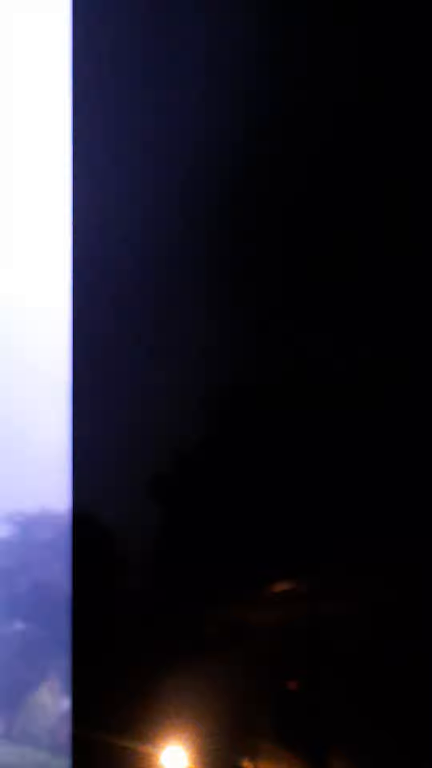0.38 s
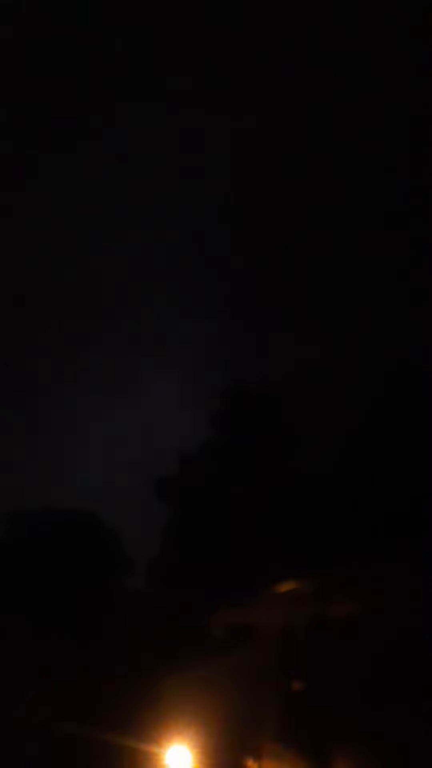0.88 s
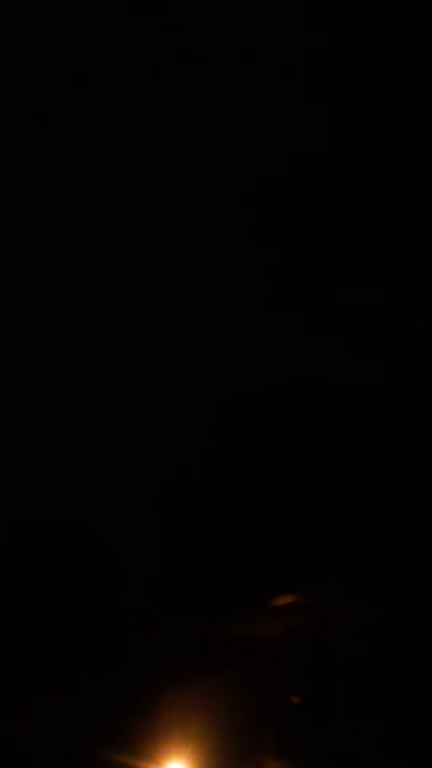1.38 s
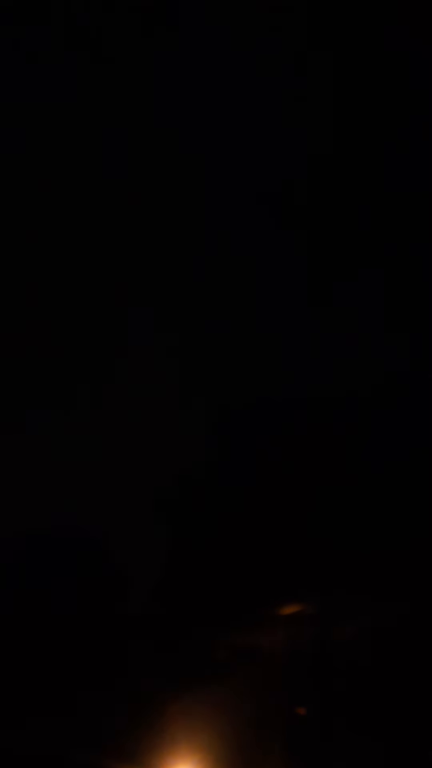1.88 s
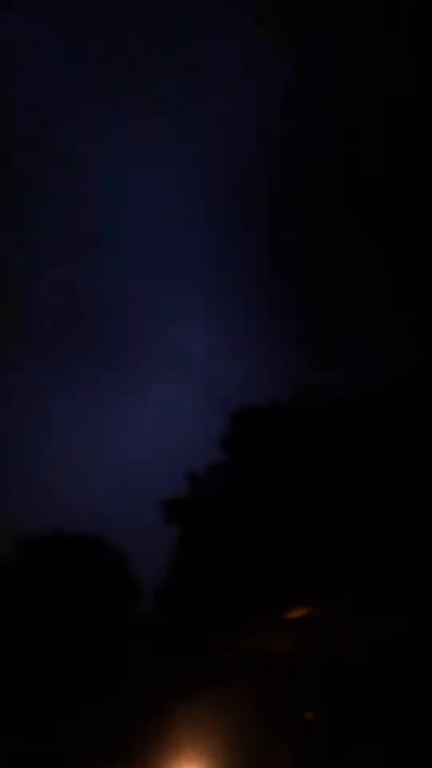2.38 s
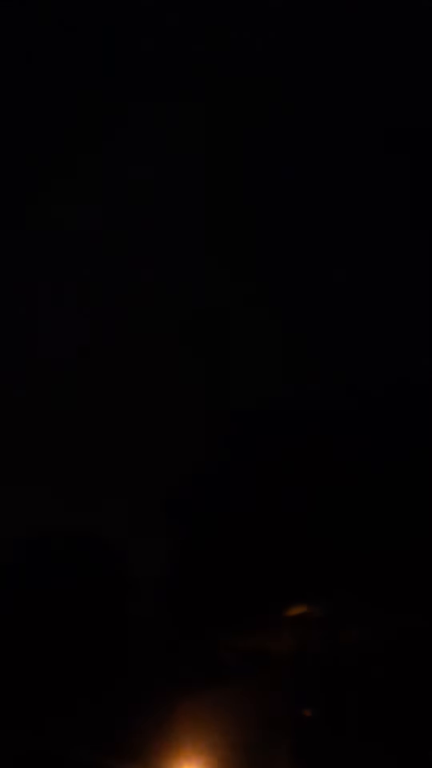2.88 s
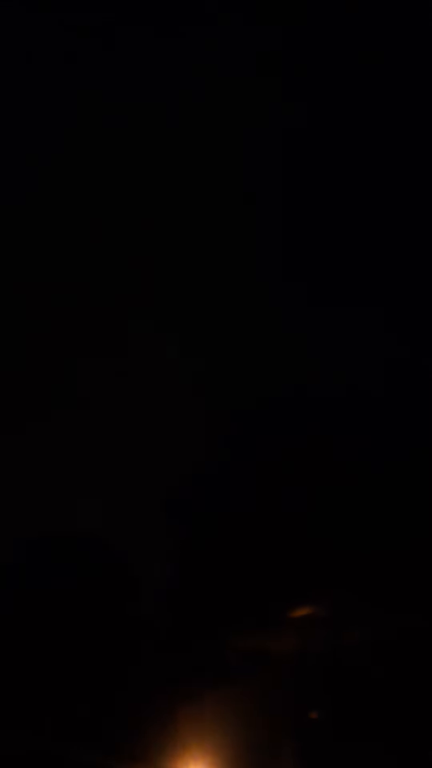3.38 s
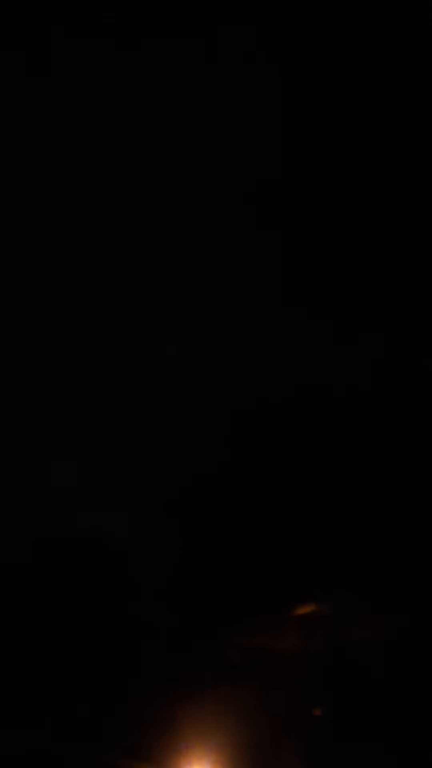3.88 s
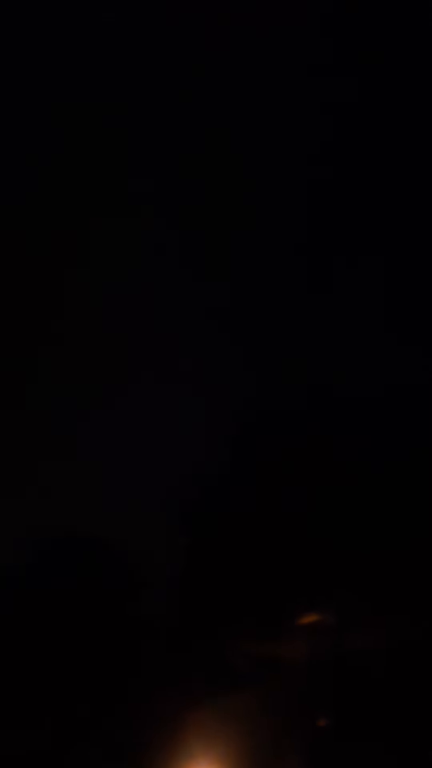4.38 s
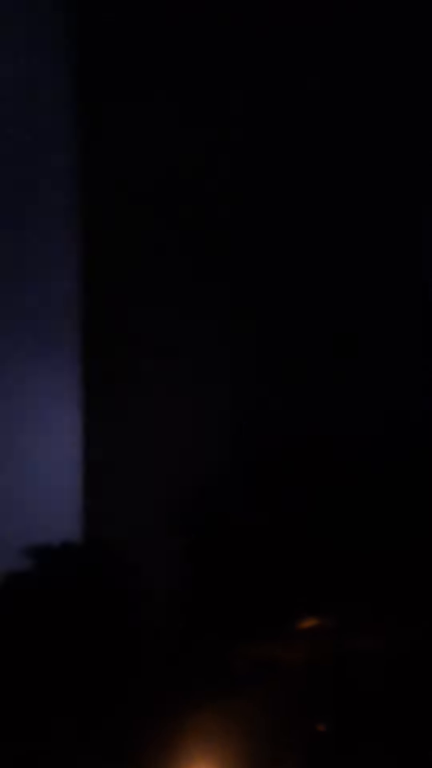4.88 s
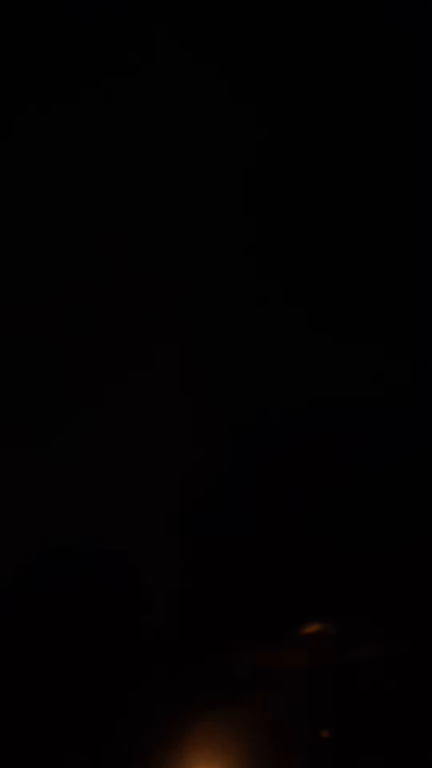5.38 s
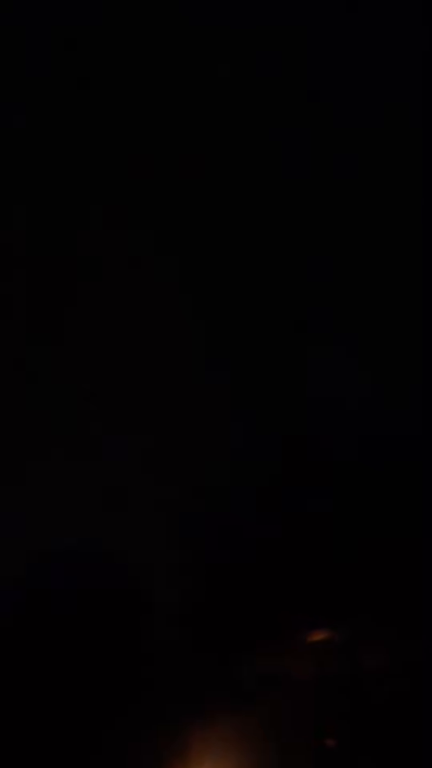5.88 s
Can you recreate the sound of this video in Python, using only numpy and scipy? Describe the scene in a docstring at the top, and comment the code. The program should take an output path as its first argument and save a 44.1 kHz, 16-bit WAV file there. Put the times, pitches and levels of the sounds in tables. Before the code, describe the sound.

An outdoor night rainstorm heard from two microphones a hand apart, near a taut cover. From 0 s big drops strike irregularly, several per second: crisp wet splats with fine bright spray, short smacks and hollow, quickly damped thumps, mostly to the left. Strong ones fall at about 0.1, 0.5, 1.1, 1.3, 1.65 and 1.8 s; they thin out from 2 to 3 s. Behind is a quiet wide rain wash with tiny ticks, dull patter and a faint far rumble. Thunder stirs around 3.2 s and bursts out loudly at 3.5 s, a dense low boom with ringing, knocking claps and rough tearing crackle. It eases around 4.2 to 4.5 s, surges with rapid claps from 4.55 to 5.4 s, then sinks, with a last clap at 5.9 s. Sharp drops still cut through, notably at 3.45, 5.0, 5.4 and 5.97 s; the thunder is still rumbling at the end.

```python
"""Big drops splat, smack and thump on a taut cover close to two microphones a hand apart, outdoors.
Splats and sprays are coloured noise bursts; smacks and thumps are dying modes of the cover.
From about 3 s thunder rolls in and then sinks: scattered shocks, with sudden ringing claps and crackle.
Behind it all lie small ticks, dull patter, a diffuse wash of rain and a far rumble, all shaped noise."""
import sys
import numpy as np
from scipy import signal
from scipy.io import wavfile
from scipy.ndimage import uniform_filter1d, minimum_filter1d

SR = 44100
rng = np.random.default_rng(int(sys.argv[2]) if len(sys.argv) > 2 else 0)


def pcm_store(signal):
    """Save signal as 16-bit PCM."""
    levels = np.round(np.clip(np.atleast_2d(signal), -1, 1) * 32767)
    wavfile.write(sys.argv[1], SR, levels.astype(np.int16).T)


def to_linear_factor(level_db):
    """Convert decibel levels (scalar or array-like) to linear amplitude factors."""
    exponent = np.asarray(level_db, float) / 20
    return 10 ** exponent


N = 265482  # samples


def evened(x):
    """Scales to rms 1."""
    return x / np.sqrt(np.mean(x ** 2) + 1e-20)


def read(points, hz):
    """Reads a table on a log-frequency axis."""
    table_hz, value = np.transpose(points)
    return np.interp(np.log(hz + 1), np.log(table_hz + 1), value)


def curve(rows):
    """Spreads a (time, level) table over every sample."""
    time_s, level_db = np.transpose(rows)
    return np.interp(np.arange(N) / SR, time_s, level_db)


def colour(x, points):
    """Minimum-phase filter whose gain follows a spectrum; white noise keeps its level."""
    level_db = read(points, abs(np.fft.fftfreq(8192, 1 / SR)))
    log_gain = np.log(to_linear_factor(np.maximum(level_db, -100)))
    taps = np.fft.ifft(np.exp(np.conj(signal.hilbert(log_gain)))).real[:4096]
    taps = taps[None] / np.linalg.norm(taps)
    return signal.oaconvolve(x, taps, axes=1)[:, :x.shape[1]]


def add(mix, start_s, sound, pan_db, lag_s):
    """Places a sound by level and arrival time; positive pan and lag favour the left microphone."""
    for side, sign in enumerate((1, -1)):
        start = max(round((start_s - sign * lag_s / 2) * SR), 0)
        part = mix[side, start:][:sound.shape[1]]
        part += to_linear_factor(sign * pan_db / 2) * sound[side, :len(part)]


def ring(modes, phases, t):
    """Sums dying sine modes (Hz, dB, t60 in s), each with a starting phase in cycles."""
    out = 0
    for (hz, db, t60), phase in zip(modes, phases):
        out = out + to_linear_factor(db - 60 * t / t60) * np.sin(2 * np.pi * (hz * t + phase))
    return out


def scattered(per_s, spread_db, centre_s, width_s, count=9):
    """Random impulses of uneven size from several directions, each with its own lag between the microphones."""
    out = np.zeros((2, N))
    for place in np.linspace(-1, 1, count):
        size = to_linear_factor(spread_db * np.minimum(rng.exponential(1, N), 4)) * rng.choice([-1., 1.], N)
        train = size * (rng.random(N) < per_s / count / SR)
        lag = round((centre_s + width_s * place) * SR)
        out += [train, np.roll(train, lag)]
    return evened(out)


# big drops close by: start_s, splat_db (noise before its envelope), spray_db (rms over the first 6 ms),
# smack_db (added to each smack mode), pan_db (left over right, for the splat)
DROPS = [(0.0074, -30, -48, -35, 2.5), (0.0204, -46, -59, -40, 11), (0.0913, -10.5, -36, -24.5, 12),
         (0.101, -21, -35.5, -29.5, 8.5), (0.1887, -23, -37, -38.5, 21.5), (0.2811, -13, -32.5, -36, 9.5),
         (0.3003, -34, -53, -37, 3.5), (0.483, -21, -36.5, -28, 19.5), (0.488, -18.5, -33, -18, 4),
         (0.4982, -35, -61, -37.5, -23), (0.5671, -42, -59, -38, 5), (0.826, -48, -60, -37.5, 2.5),
         (0.958, -48, -62, -39, 2), (0.9797, -42, -58, -38, 5), (1.014, -25.5, -34.5, -27.5, 20),
         (1.0425, -38.5, -48, -36, -30), (1.116, -14.5, -34, -24, 6), (1.264, -30, -43, -35, 4.5),
         (1.2785, -24.5, -42, -25.5, 6), (1.3132, -23.5, -36, -27, 7), (1.3424, -39, -51, -38.5, 1),
         (1.393, -32, -46, -48, 4.5), (1.551, -33, -47, -33.5, 6), (1.5898, -25, -46, -37, 4.5),
         (1.601, -32, -43, -40, 6.5), (1.644, -21, -40, -24, -7), (1.694, -30.5, -50, -48, 3.5),
         (1.7672, -24.5, -46, -38, 5), (1.7947, -21, -35, -32.5, 11.5), (1.9844, -27.5, -40, -38.5, 11.5),
         (2.1156, -27, -54, -28, -2), (2.1928, -37.5, -44, -32, -11), (2.2301, -32, -42, -34, 6),
         (2.2573, -27, -45, -34, 1.5), (2.303, -39, -34.5, -58, 3), (2.492, -29.5, -43, -29, 6.5),
         (2.5697, -28.5, -40, -38, 4), (2.7137, -36, -44, -33.5, 10), (2.8657, -17, -38, -24.5, 5.5),
         (3.1732, -23, -34.5, -28.5, 5), (3.3613, -26, -37, -49, -2.5), (3.368, -44, -33.5, -51, -1),
         (3.3844, -22, -47, -22, 3), (3.3914, -24, -32, -27, 7), (3.456, -10.5, -29, -20, 4.5),
         (3.604, -22, -36, -44, 4), (3.7051, -22, -32.5, -24.5, 0.5), (3.806, -25, -45, -48, 5.5),
         (3.9539, -25, -34, -27, 5.5), (4.3467, -52, -47, -26, 9.5), (4.492, -31, -42.5, -52, 0.5),
         (4.7441, -30, -36.5, -34, 7.5), (4.8923, -32, -48, -38, 2), (4.9755, -14, -31.5, -25, 5.5),
         (5.215, -53, -44.5, -50, -2), (5.2859, -39, -49, -43, 3), (5.31, -34, -42.5, -35, 3.5),
         (5.4218, -13.5, -24.5, -14.5, 22), (5.9657, -22, -33, -19.5, 25)]
# colour of the splat: pitch_hz, level_db (per Hz)
SPLAT_SPECTRUM = [(1500, -11), (2600, -0.5), (3500, -3), (5200, -5.5), (6500, -14.5), (7500, -14),
                  (9000, -38)]
# colour of the finer spray: pitch_hz, level_db (per Hz)
SPRAY_SPECTRUM = [(5000, -53), (7000, -20.5), (8500, 0), (11500, 1), (14500, 0), (16500, -16), (17500, -60)]
# modes of the smack: pitch_factor, level_db, t60_s
SMACK_MODES = [(0.984, 12.5, 0.011), (0.56, 14, 0.0073), (1.427, 3, 0.015), (0.96, 20, 0.0033)]


def drops():
    """A drop bursts in a splat, finer spray and a short smack; the near microphone gets it first and louder."""
    splats, sprays, smacks = np.zeros((3, 2, N))
    t = np.arange(2500) / SR
    onset = 1 - np.exp(-t / 0.00048)
    shape = onset * (to_linear_factor(-60 * t / 0.01) + to_linear_factor(-27.5 - 60 * t / 0.031))  # quick fall, then a faint tail
    spray_shape = shape / np.sqrt(np.mean(shape[:260] ** 2))
    for start_s, splat_db, spray_db, smack_db, pan_db in DROPS:
        lag_s = 6e-4 * np.tanh(pan_db / 6)
        splat_noise, spray_noise = rng.standard_normal((2, 2, len(t)))
        add(splats, start_s, to_linear_factor(splat_db) * splat_noise * shape, pan_db, lag_s)
        add(sprays, start_s, to_linear_factor(spray_db) * spray_noise * spray_shape, 0.38 * pan_db, lag_s)
        # a sharp drop, its splat strong against its smack, smacks higher: base pitch 1230 to 1740 Hz
        base_hz = 1230 + 1020 / (2 + np.exp((2.5 + smack_db - splat_db) / 0.8))
        modes = [(base_hz * factor, db, t60) for factor, db, t60 in SMACK_MODES]
        smack = to_linear_factor(smack_db) * ring(modes, rng.random(len(modes)), t) * onset
        add(smacks, start_s, np.array([smack, smack]), 0.89 * pan_db, lag_s)
    return colour(splats, SPLAT_SPECTRUM) + colour(sprays, SPRAY_SPECTRUM) + smacks


# heaviest drops on the cover: start_s, level_db, pitch_hz, t60_s (each before the mode table), pan_db
THUMPS = [(0.02, -23.5, 630, 0.015, -17), (0.09, -14, 295, 0.049, 5), (0.103, -26.5, 182, 0.14, 10),
          (0.282, -16.5, 405, 0.027, 18), (0.486, -21, 445, 0.073, -14.5), (0.491, -4, 161, 0.017, -16),
          (0.499, -22, 175, 0.066, -12), (0.982, -32.5, 150, 0.053, 0), (1.013, -19, 421, 0.042, 6),
          (1.0433, -19, 436, 0.03, -8), (1.115, -24.5, 570, 0.037, 5), (1.277, -35, 434, 0.074, 1),
          (1.317, -12.5, 320, 0.031, -4.5), (1.34, -17, 430, 0.014, -5.5), (1.538, -30, 365, 0.06, 4),
          (1.551, -32.5, 326, 0.079, -5), (1.643, -8, 559, 0.025, -7.5), (1.794, -6, 368, 0.025, -5),
          (2.115, -27, 291, 0.055, 5), (2.492, -23.5, 324, 0.073, 5), (2.714, -27, 400, 0.044, 4),
          (2.868, -25, 375, 0.039, 0), (3.391, -16.5, 317, 0.048, 6), (3.454, -15, 347, 0.031, 7),
          (5.424, -11, 400, 0.05, 5), (5.967, -3.5, 315, 0.027, 4.5)]
# modes of the taut cover: pitch_factor, level_db, decay_factor
COVER_MODES = [(1.039, 6.5, 0.78), (0.6, -17, 3.1), (1.824, -1, 0.76)]


def thumps():
    """The cover rings low and short; each microphone sits under a different part of it."""
    out, t = np.zeros((2, N)), np.arange(6000) / SR
    onset = 1 - np.exp(-t / 0.00049)
    slack = 0.22  # cycles by which the cover's motion may differ from place to place
    for start_s, level_db, pitch_hz, t60, pan_db in THUMPS:
        modes = [(pitch_hz * factor, db, t60 * longer) for factor, db, longer in COVER_MODES]
        phases = slack * rng.random((2, len(modes)))
        thump = np.array([ring(modes, phase, t) for phase in phases]) * onset
        add(out, start_s, to_linear_factor(level_db) * thump, pan_db, 0.00044 * np.tanh(pan_db / 6))
    return out


# sudden claps inside the roll: start_s, level_db, pitch_hz (both before the partials)
CLAPS = [(3.217, -20, 240), (3.243, -22, 150), (3.328, -13, 384), (3.362, -18, 196), (3.509, -3.5, 144),
         (3.529, -0.5, 142), (3.559, 0, 138.5), (3.612, -9, 454), (3.646, -8, 385), (3.673, 1.5, 279),
         (3.739, -13, 222), (3.752, 0, 212), (3.792, -1.5, 268), (3.806, -3.5, 277), (3.835, -5, 285),
         (3.857, -11, 268), (3.9, -6, 296), (3.917, -4, 203), (3.976, -9, 137), (4.042, -7, 445),
         (4.152, -9.5, 200), (4.54, -5, 359), (4.594, -4, 275), (4.632, -7.5, 145), (4.682, -1, 312),
         (4.725, -12, 294), (4.745, -0.5, 296.5), (4.782, -2.5, 160), (4.836, -1.5, 376),
         (4.849, -2.5, 242), (4.9, -5.5, 277), (4.963, -1.5, 249), (5.068, -2, 258), (5.121, -10, 362),
         (5.138, 0.5, 250), (5.18, -3, 423), (5.193, -1, 347), (5.238, -2.5, 295), (5.25, -5, 216),
         (5.321, 1, 206), (5.354, -4.5, 332), (5.404, -2.5, 348), (5.467, -10, 298), (5.547, -12.5, 284),
         (5.611, -14, 204), (5.899, -6.5, 208)]
# partials of a steep shock front: pitch_factor, level_db, decay_factor
FRONT_PARTIALS = [(1.0, -2.5, 1.01), (1.6, -7.5, .8), (2.4, -9.5, 0.47), (3.7, -15, 0.46)]


def claps(crackle):
    """Each shock front rings as dying partials, with a burst of tearing crackle riding on it."""
    fronts, crack_shapes = np.zeros((2, 2, N))
    t = np.arange(6000) / SR
    onset, lag_s = 1 - np.exp(-t / 0.00039), 3.6e-4
    crack_shape = to_linear_factor(-17.5 - 60 * t / 0.024) * np.minimum(t / 0.0037, 1)
    for start_s, level_db, pitch_hz in CLAPS:
        t60 = 0.025 + 9.4 / pitch_hz  # a fixed time plus 9.4 cycles: low claps last longer
        modes = [(pitch_hz * factor, db, t60 * longer) for factor, db, longer in FRONT_PARTIALS]
        front = ring(modes, 0.28 * rng.random(len(modes)), t) * onset
        add(fronts, start_s, to_linear_factor(level_db) * np.array([front, front]), 0, lag_s)
        crack = to_linear_factor(level_db) * crack_shape
        add(crack_shapes, start_s, np.array([crack, crack]), 0, lag_s)
    return fronts + crack_shapes * crackle


# low roll under the claps, before its lumps: time_s, level_db
PEAL = [(2.95, -48.5), (3.25, -38), (3.4, -28), (3.49, -28.5), (3.515, -15.5), (3.8, -14.5), (4.15, -18),
        (4.22, -19), (4.49, -21.5), (4.53, -17.5), (4.93, -20), (5.06, -17), (5.17, -17), (5.44, -19),
        (5.52, -23.5), (5.85, -26.5), (6.02, -27.5)]
# tearing above the roll, before its lumps: time_s, level_db
TEAR = [(2.95, -52), (3.25, -67), (3.33, -32.5), (3.6, -33), (3.75, -28), (4.1, -25), (4.5, -30),
        (5.35, -34.5), (5.5, -37), (6.02, -46)]
# colour of the low roll: pitch_hz, level_db (per Hz)
BOOM_SPECTRUM = [(12, -51), (20, -30), (117, -1), (166, -1.5), (270, -3.5), (312, -5), (367, -1), (431, -5),
                 (507, -2.5), (826, -17), (1010, -15.5), (1500, -19.5), (1950, -24.5), (3300, -120)]


def roll(crackle):
    """Dense scattered shocks make a boom; it and the tearing swell in shared lumps some 15 ms long."""
    boom = evened(colour(scattered(900, 0.95, 0.00025, 0.00022), BOOM_SPECTRUM))
    lumps = evened(uniform_filter1d(rng.standard_normal(N), size=700))
    low = to_linear_factor(curve(PEAL) + 1.31 * lumps) * boom
    tearing = to_linear_factor(curve(TEAR) + 1.95 * lumps) * crackle
    sounding = np.arange(N) / SR > PEAL[0][0]
    return (low + tearing) * sounding


# colour of the tearing crackle: pitch_hz, level_db (per Hz)
CRACKLE_SPECTRUM = [(410, -27), (700, 0), (809, 6), (1820, 1), (2000, 0), (2380, 2), (2550, -3),
                    (2890, -12.5), (5500, -34), (7000, -77), (9100, -81), (15400, -120)]


def thunder():
    """Shocks from the bends of the channel arrive scattered, at the left microphone first and a little louder."""
    crackle = evened(colour(scattered(3500, 0.79, 0.00034, 1.2e-4), CRACKLE_SPECTRUM))
    return (roll(crackle) + claps(crackle)) * to_linear_factor([[0.6], [-0.6]])


# likeness of the two microphones in sound from all sides: pitch_hz, likeness (1 is identical)
LIKENESS = [(60, 0.92), (180, 0.88), (550, 0.46), (1650, 0.19), (4970, -0.2), (15000, 0.041)]


def diffuse(points, patchy_db, flicker_db):
    """Noise from all sides: alike in the bass only, with patches and a flicker shared by all bands."""
    hop = 128  # samples
    frames, hz = N // hop + 5, np.fft.rfftfreq(4 * hop, 1 / SR)
    a, b, c, d, patches = rng.standard_normal((5, len(hz), frames))
    patches = evened(uniform_filter1d(uniform_filter1d(patches, size=8, axis=0), size=16, axis=1))
    flicker = evened(uniform_filter1d(rng.standard_normal(frames), size=3))
    same = np.clip(read(LIKENESS, hz), -1, 1)[:, None]
    left, other = a + 1j * b, c + 1j * d
    bands = np.array([left, same * left + np.sqrt(1 - same ** 2) * other])
    bands *= to_linear_factor(patchy_db * patches + flicker_db * flicker)
    noise = signal.istft(bands, nperseg=4 * hop, noverlap=3 * hop)[1][:, :N]
    return evened(colour(noise, points))


def small_drops(per_s, spread_db, points):
    """Scattered small drops, each a noise burst that dies by 60 dB in 12 ms."""
    t = np.arange(300) / SR
    burst = rng.standard_normal((1, 300)) * to_linear_factor(-60 * t / 0.012)
    hits = signal.oaconvolve(scattered(per_s, spread_db, 0, 0.00051), burst, axes=1)[:, :N]
    return evened(colour(hits, points))


# level at which the wash is heard, dipping at times; ticks and patter follow it: time_s, level_db
WASH_LEVEL = [(0, -42), (.33, -40), (.62, -44.5), (1.39, -45.5), (2.2, -41.5), (3.15, -41.5), (3.35, -36.5),
              (3.69, -47), (4.78, -47), (5.33, -52), (6.02, -46)]
# colour of the wash and the ticks: pitch_hz, level_db (per Hz)
WASH_SPECTRUM = [(120, -31), (250, -12.5), (500, -5.5), (1000, -11), (1700, -8), (2500, -8.5),
                 (3000, -19.5), (5200, -18.5), (6000, -20), (7200, -27.5), (9500, -22), (12500, -22),
                 (15500, -31), (16800, -88)]
# colour of the dull patter on the cover: pitch_hz, level_db (per Hz)
PATTER_SPECTRUM = [(250, -44), (500, 2), (1200, -3), (2000, -17), (3500, -37)]


def rain():
    """A wash from all sides, small ticks and dull patter on the cover share one level curve."""
    wash = diffuse(WASH_SPECTRUM, patchy_db=1.5, flicker_db=1.7)
    ticks = to_linear_factor(-23.5) * small_drops(17, 1.8, WASH_SPECTRUM)  # dB against the wash, as for the patter
    patter = to_linear_factor(-8.5) * small_drops(25, 7.4, PATTER_SPECTRUM)
    return to_linear_factor(curve(WASH_LEVEL)) * (wash + ticks + patter)


# level of the far rumble: time_s, level_db
FAR_LEVEL = [(0.0, -44), (0.26, -46), (0.99, -45.5), (2.3, -43), (3.1, -44.5)]
# colour of the far rumble: pitch_hz, level_db (per Hz)
RUMBLE_SPECTRUM = [(12, -60), (20, -45), (60, -3), (145, -3), (220, -8), (278, -8.5), (356, -21),
                   (450, -11), (580, -25), (990, -120)]


def far_rumble():
    """Low diffuse noise from far off lies under the rain."""
    return to_linear_factor(curve(FAR_LEVEL)) * diffuse(RUMBLE_SPECTRUM, patchy_db=0.95, flicker_db=0.57)


def scene():
    """Drops, thumps, thunder, rain and far rumble together."""
    return drops() + thumps() + thunder() + rain() + far_rumble()


def band_limit(x):
    """A steep low-pass at the top of the band."""
    return signal.sosfilt(signal.butter(12, 16990, fs=SR, output="sos"), x)


def record(dry):
    """The microphones lose the deepest bass; a look-ahead limiter holds the peaks at full scale."""
    heard = signal.sosfilt(signal.butter(N=2, Wn=55, btype="high", fs=SR, output="sos"), dry)
    headroom = np.minimum(1 / (abs(heard).max(0) + 1e-9), 1)
    gain = uniform_filter1d(minimum_filter1d(headroom, size=177), size=177)  # 4 ms windows
    return band_limit(heard * gain)


dry = scene()
out = record(dry)
pcm_store(out)
```